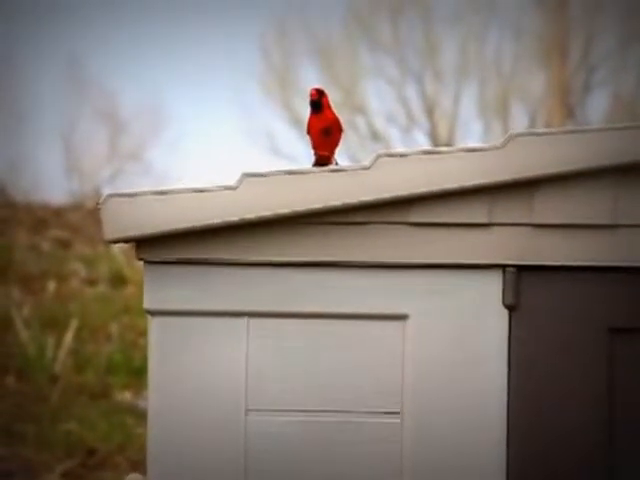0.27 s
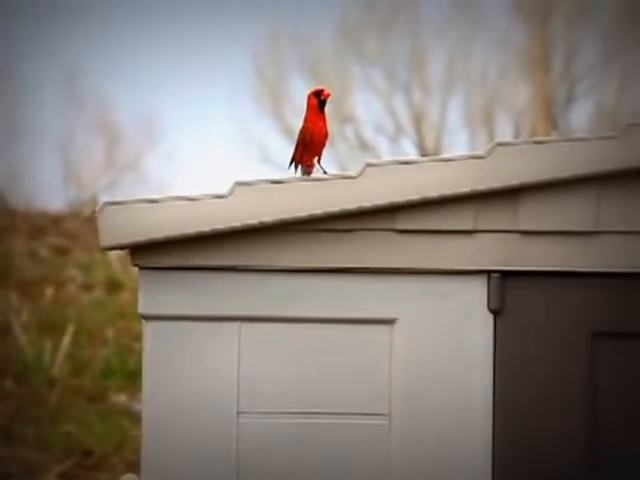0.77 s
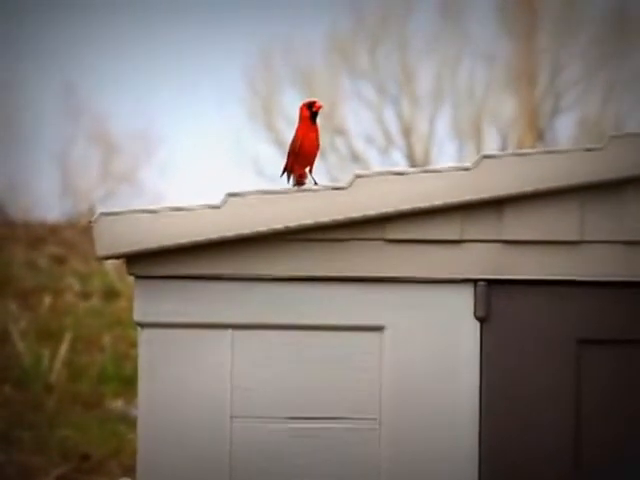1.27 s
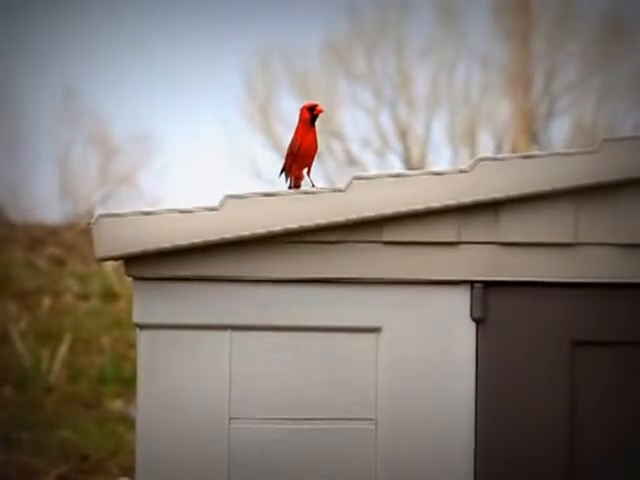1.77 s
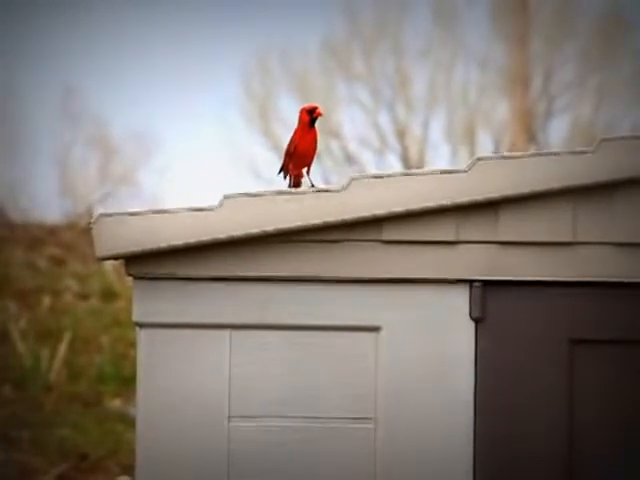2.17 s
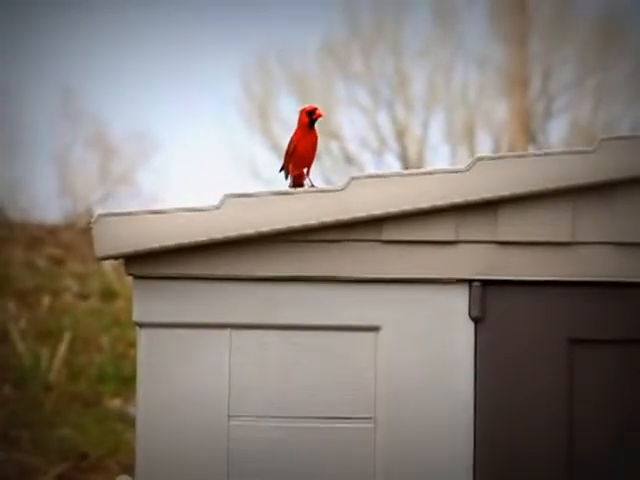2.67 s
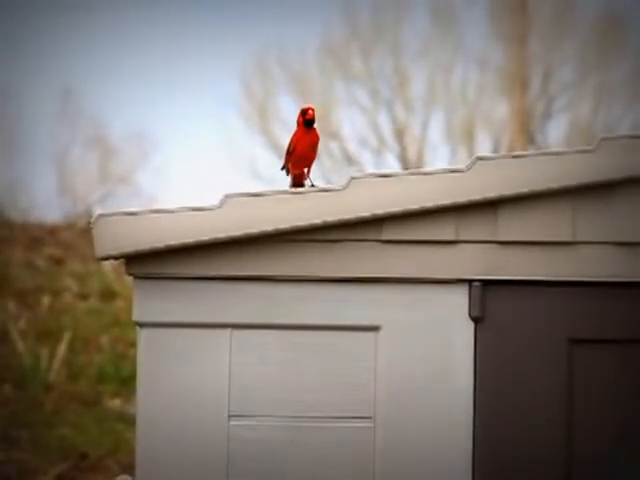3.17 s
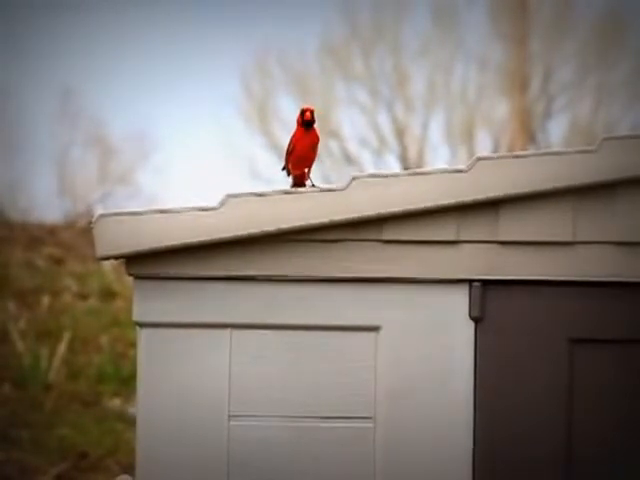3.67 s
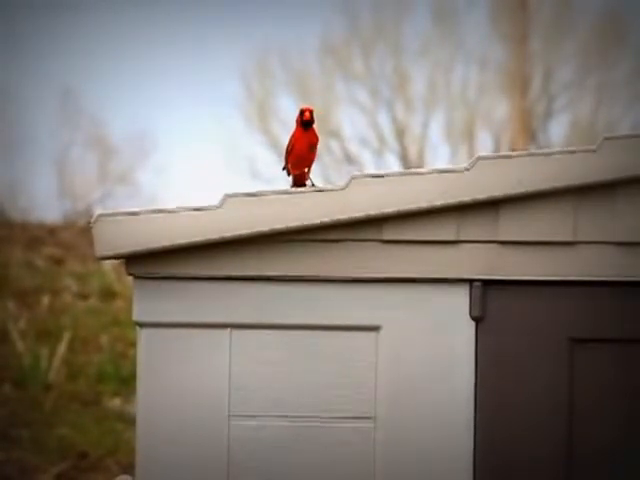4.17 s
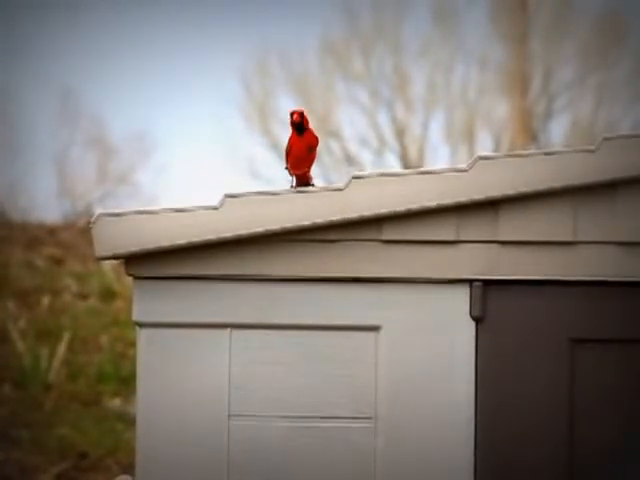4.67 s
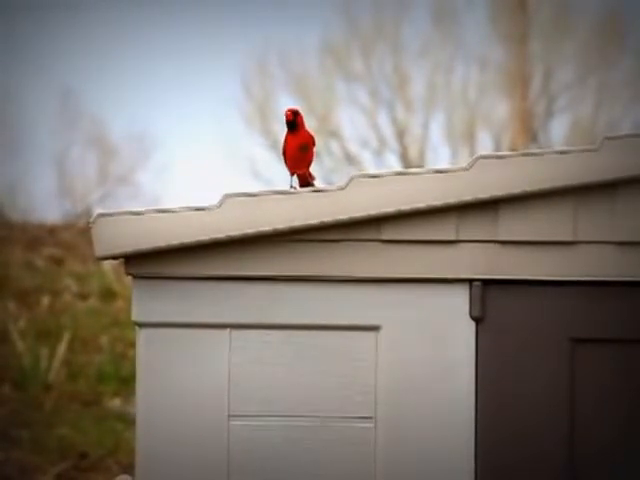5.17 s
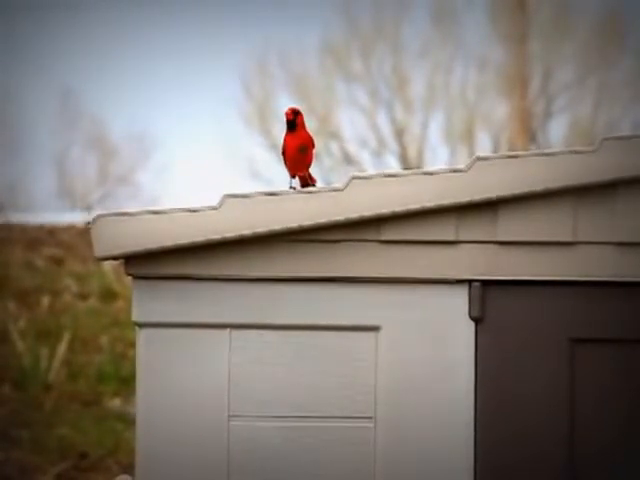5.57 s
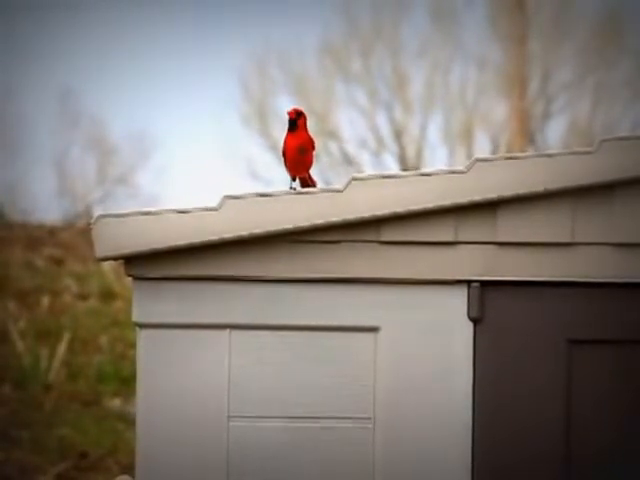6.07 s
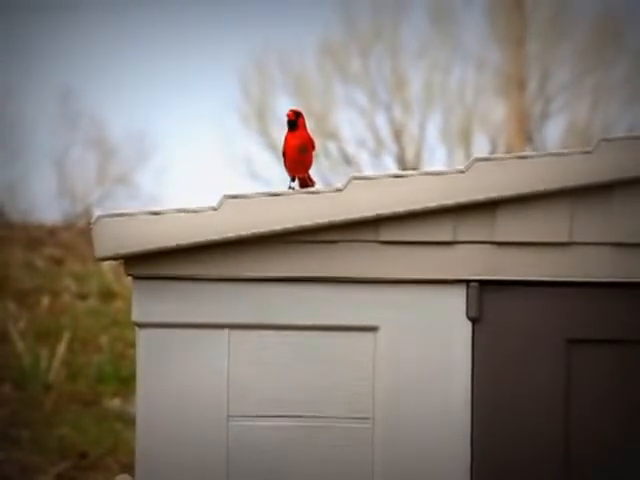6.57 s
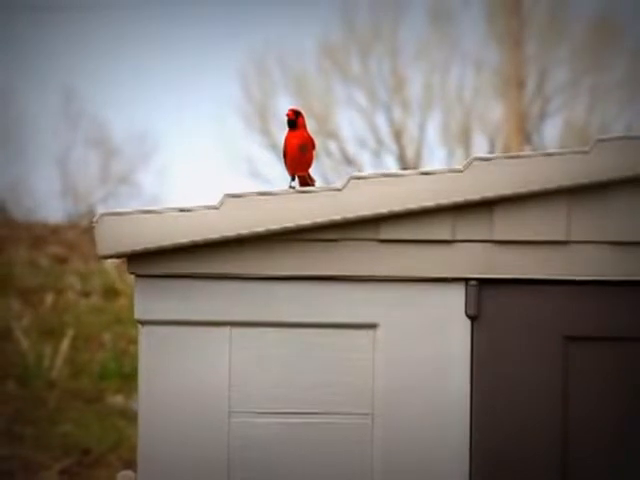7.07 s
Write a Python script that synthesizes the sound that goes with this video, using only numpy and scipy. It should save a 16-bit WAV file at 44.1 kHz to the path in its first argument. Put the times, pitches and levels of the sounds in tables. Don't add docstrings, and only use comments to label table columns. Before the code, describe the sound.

A red songbird on a shed roof whistles two quick arched phrases, with echoing yard birds chirping behind and a truck droning past on a road.

```python
import sys
import numpy as np
from scipy import signal
from scipy.fft import rfft, irfft, next_fast_len
from scipy.io import wavfile
from scipy.ndimage import uniform_filter1d

SR = 44100
rng = np.random.default_rng(int(sys.argv[2]) if len(sys.argv) > 2 else 0)


def ratio(d):
    e = np.asarray(d, float) / 20
    return 10 ** e


def master_out(mix):
    frames = np.transpose(np.atleast_2d(mix))
    ceiling = np.clip(frames, -1, 1)
    pcm = np.round(ceiling * 32767).astype(np.int16)
    wavfile.write(sys.argv[1], SR, pcm)


N = 323253

# (multiple of the pitch, level [dB])
ARCH = ([(0, 1900, -18), (.012, 2060, -3), (.027, 2175, 0), (.045, 2228, 3), (.058, 2135, 2),
         (.071, 1910, -1), (.085, 1730, -5), (.12, 1670, -12)], [(4, -17), (5, -37), (6, -25), (7, -40)])
# (time after start [s], pitch [Hz], level [dB])
PIP = [(0, 6620, -2), (.03, 6540, 0), (.04, 6500, -4), (.046, 6550, -24), (.053, 6620, -4),
       (.078, 6560, -7)]
# (time [s], level [dB], pitch factor, length factor)
PIPS = [
    (6.85, -51, .96, .95),
    (6.95, -48, 1., 1.1),
    (7.072, -45, 1., 1.),
    (7.2, -46, 1.01, 1.05),
]


def evened(x):
    return x / np.sqrt(np.mean(x ** 2) + 1e-20)


def read(points, hz):
    f, value = np.transpose(points)
    return np.interp(np.log(hz + 1), np.log(f + 1), value)


def add(mix, s, sound):
    at = round(s * SR)
    sound = sound[max(-at, 0):]
    part = mix[max(at, 0):][:len(sound)]
    part += sound[:len(part)]


def slow(count, top_hz):
    size = next_fast_len(count + SR)
    z = rfft(rng.standard_normal(count + SR), size)
    lowpass = np.exp(-(np.fft.rfftfreq(size, 1 / SR) / top_hz) ** 2)
    return evened(irfft(z * lowpass)[:count])


def noise(spectrum, patchy_db):
    frames, hz = N // 256 + 5, np.fft.rfftfreq(1024, 1 / SR)
    a, b, patches = rng.standard_normal((frames, 513, 3)).T
    patches = uniform_filter1d(patches, 12, axis=0)
    patches = evened(uniform_filter1d(patches, 14, axis=1))
    z = (a + 1j * b) * ratio(read(spectrum, hz)[:, None] + patchy_db * patches)
    return evened(signal.istft(z, nperseg=1024, noverlap=768)[1][:N])


def band(count, hz, width):
    size = next_fast_len(count)
    f = np.fft.rfftfreq(size, 1 / SR)
    bell = np.exp(-(2 * (f - hz) / width) ** 2)
    return evened(irfft(rfft(rng.standard_normal(count), size) * bell, size)[:count])


def rasp(x, hz, width):
    return uniform_filter1d(np.abs(x), 100) * band(N + 1, hz, width)[:N]


def whistle(rows, overtones=(), flutter_db=0., wobble=0.):
    s, hz, db = np.transpose(rows)
    t = np.arange(s[0], s[-1], 1 / SR)
    span = int(SR * np.min(np.diff(s)) * 0.6) + 1
    hz, db = (uniform_filter1d(np.interp(t, s, c), span, mode="nearest") for c in (hz, db))

    smooth = signal.butter(2, 350, fs=SR, output="sos")
    shake = evened(signal.sosfilt(smooth, rng.standard_normal((2, 9000))))[:, 500:500 + len(t)]
    phase = 2 * np.pi * np.cumsum(hz * (1 + wobble * shake[0])) / SR

    upper = 0
    for k, overtone_db in overtones:
        below_16k = np.clip((16000 - k * hz) / 800, 0, 1)
        upper = upper + ratio(overtone_db) * np.sin(k * phase) * below_16k
    beak = np.clip((t[-1] - t) / (.45 * (t[-1] - t[0])), 0, 1) ** 2
    tone = np.sin(phase) + ratio(-.4 * (db - db.max())) * upper * beak
    edge = np.sin(np.pi / 2 * np.clip(np.minimum(t - t[0], t[-1] - t) / .003, 0, 1)) ** 2
    return s[0], np.sqrt(2) * ratio(db + flutter_db * shake[1]) * tone * edge


def sing(calls, shape, overtones, flutter_db, wobble):
    out = np.zeros(N)
    for s, db, pitch, length in calls:
        path = np.array(shape) * [length, pitch, 1] + [s, 0, db]
        add(out, *whistle(path, overtones, flutter_db, wobble))
    return out


def glides(rows, flutter_db, wobble):
    out, share = np.zeros(N), np.array([0, .49, 1])
    for s, length, first_hz, last_hz, db in rows:
        hz = first_hz + (last_hz - first_hz) * share
        path = [s + length * share, hz, db - 6.5 * np.array([1, 0, 1])]
        add(out, *whistle(np.transpose(path), (), flutter_db, wobble))
    return out


def bursts(rows):
    out = np.zeros(N)
    for s, length, hz, width, db in rows:
        count = int(length * SR)
        burst = band(8192, hz, width) * ratio(4.0 * band(8192, 0, 250))
        add(out, s, ratio(db) * burst[:count] * np.hanning(count))
    return out


def singer():
    # (multiple of the pitch, level [dB])
    late_arch = (ARCH[0], [(4, -16.5), (5, -32), (6, -33), (7, -36)])
    rise = ([(0, 2450, 0), (.003, 3100, 1.5), (.006, 3600, 0), (.01, 3720, -3), (.02, 3740, -11)],
             [(2, -33), (3, -31), (4, -37)])
    fall = ([(0, 7400, -13), (.0035, 5800, -10), (.007, 4300, -2), (.012, 4170, 0), (.022, 4170, -3),
             (.039, 4150, -3)], [(2, -22), (3, -32)])
    hook = ([(0, 5000, -6), (.004, 4580, 0), (.015, 4520, -2), (.03, 4490, -5)], [(2, -34), (3, -30)])
    slur = ([(0, 2630, -3), (.01, 2657, 2.5), (.025, 2440, -6), (.04, 2084, -3.5), (.052, 2080, -17),
             (.062, 2143, -16), (.075, 2130, -19)], [(4, -26.5), (5, -34)])
    dip = ([(0, 2077, -6), (.015, 2044, -3), (.035, 2020, -4.5), (.055, 1910, -15), (.07, 1734, -28)],
            [(2, -31), (4, -37)])
    hill = ([(0, 1750, -9), (.008, 3370, -6), (.037, 3320, 1), (.042, 3050, 3), (.047, 2620, 3),
             (.052, 2560, -2)], [(5, -36)])
    # (time [s], level [dB], pitch factor, length factor)
    arches = [(-.058, -34.5, 1., 1.), (.19, -33.5, 1., 1.), (.451, -34, .99, 1.)]
    late_arches = [(5.458, -34.5, 1.007, 1), (5.711, -34, 1, 0.99), (5.958, -33.5, 1., 1),
                   (6.217, -32, 1.04, 0.86)]
    rises = [(.069, -28.5, 1., 1.25), (.313, -28, .98, 1.1), (.574, -29.5, .99, 1.1),
             (4.902, -34, 1.05, 1.), (5.323, -30, 1.05, 1.05), (5.582, -29.5, 1.03, 1.15),
             (5.835, -29, 1., 1.1), (6.085, -29.5, .99, 1.15), (6.322, -26.5, .945, 1.3)]
    falls_sung = [(.092, -24.5, 1.02, 1.05), (.335, -24.5, 1.005, 1.1), (.601, -30.5, 1., .45),
                  (5.608, -24.5, 1.044, 1.05), (5.859, -26.5, 1.01, .9), (6.111, -26.5, .972, .85),
                  (6.348, -24, .966, .92)]
    hooks = [(4.931, -35, 1.01, 1.), (5.352, -27, 1., 1.)]
    slurs = [(4.846, -31, 0.99, 0.83), (5.262, -26.5, 0.97, 1)]
    dips = [(5.055, -28.5, 1., .95), (5.2, -31, 1., 1.1)]
    hills = [(4.985, -32, 1., 1.07), (5.135, -33.5, 1., 1.03)]
    calls = arches, late_arches, rises, hooks, slurs, dips, hills
    shapes = ARCH, late_arch, rise, hook, slur, dip, hill
    rest = sum(sing(c, *shape, flutter_db=1.5, wobble=.00098) for c, shape in zip(calls, shapes))
    falling = sing(falls_sung, *fall, flutter_db=2.8, wobble=.003)
    return rest + falling + ratio(-27) * rasp(falling, 12100, 1600)


def chirper():
    # (time after start [s], pitch [Hz], level [dB])
    strands = [
        [(.006, 3800, -14), (.018, 4300, -4), (.025, 4740, -1), (.054, 4760, -4), (.058, 4050, -1),
         (.064, 3750, -1), (.074, 3350, -7)],
        [(.018, 4700, -12), (.027, 5400, -5), (.04, 5200, -9), (.052, 5200, -3), (.062, 5250, -12),
         (.08, 5200, -9), (.09, 5200, -16)],
        [(.022, 3900, -12), (.035, 4250, -7), (.055, 4150, -10)],
        [(.073, 4150, -2), (.089, 3400, -6)],
    ]
    # (time [s], level [dB], pitch factor, length factor)
    chirps = [
        (-.01, -30, 1., 1.),
        (2.57, -31, 1., 1.),
        (4.392, -27, 1., 1.),
        (5.853, -29.5, .995, .92),
    ]
    overtones = [(2, -31), (3, -34)]
    return sum(sing(chirps, strand, overtones, flutter_db=2.5, wobble=.012) for strand in strands)


def strays():
    # (time [s], pitch [Hz], level [dB])
    earlier = [(-.005, 2180, -33), (.025, 2180, -42), (.05, 2170, -48), (.15, 2120, -51)]
    # (time [s], length [s], first pitch [Hz], last pitch [Hz], level [dB])
    faint_falls = [(1.655, .014, 5000, 3500, -42), (1.678, .014, 4800, 3700, -44),
                   (1.6, .05, 2700, 3300, -54), (2.055, .022, 4800, 4300, -50),
                   (2.098, .02, 3100, 2600, -52), (.165, .014, 4200, 3700, -42),
                   (.183, .012, 4300, 3600, -42), (3.575, .014, 5000, 3200, -44),
                   (2.93, .02, 4650, 4700, -47), (2.878, .014, 3800, 3750, -45),
                   (4.415, .03, 3000, 2850, -41), (.902, .06, 3320, 3300, -47),
                   (2.895, .04, 4360, 4280, -44), (4.5, .05, 3380, 3850, -40), (4.51, .03, 3950, 4200, -43),
                   (2.375, .15, 2660, 2640, -52), (1.473, .016, 6900, 8100, -53),
                   (5.045, .028, 2900, 2600, -38), (1.992, .032, 4500, 4560, -45),
                   (4.905, .014, 3900, 3950, -37)]
    upper_pip = np.array(PIP) * [1, 1.345, 1] + [.012, 0, -18]
    out = sing(PIPS, upper_pip, (), flutter_db=5., wobble=.012)
    add(out, *whistle(earlier, (), flutter_db=3., wobble=.004))
    return out + glides(faint_falls, flutter_db=3.5, wobble=.012)


def truck():
    # (time [s], cycle rate [Hz])
    speed = [(0.0, 19.9), (0.59, 22.0), (1.45, 25.5), (1.65, 23.1), (2.2, 17.8), (3.0, 19.9), (4.12, 22.9),
             (5.25, 25.5), (6.08, 27.6), (6.6, 21.2), (6.74, 21.1), (7.33, 22.2)]
    # (time [s], level [dB])
    boom = [(0, -37.5), (1.0, -34), (2.15, -38.5), (2.75, -34), (3.3, -35.5), (3.56, -28), (4.26, -23.5),
            (4.85, -25.5), (5.2, -28), (6.45, -28.5), (7.04, -37), (7.33, -25.5)]
    # (time [s], half width [s], depth [dB])
    fades = [(1.46, 0.057, -14), (1.99, 0.06, -6), (3.87, 0.1, -14), (4.531, 0.091, -13.5),
             (5.05, 0.058, -8), (6.58, 0.035, -14)]
    # (time [s], level [dB])
    strain = [(0, -27), (1.4, -24), (1.7, -30), (2.4, -7), (2.95, -5.5), (3.3, -5), (4.7, -2.5),
              (5.7, -10.5), (6.15, -10), (6.5, -9), (6.9, 7), (7.33, -1.5)]
    # (multiple, level [dB], share of boom swing, share of strain)
    weaker_orders = [(7, -49, .6, .5), (6, -47, .7, .4), (4, -45, .3, .1), (16, -60.5, .45, .6)]
    # (frequency [Hz], half width [Hz], gain [dB])
    pipe = [(155, 18, 11), (375, 26, 11)]
    # (multiple, level [dB])
    side_orders = [(2, -64), (3, -79), (8, -50), (9, -54), (10, -57.5), (11, -58), (12, -61), (14, -60.5),
                   (18, -60.5), (21, -63.5)]

    t = np.arange(N) / SR
    hz = uniform_filter1d(np.interp(t, *np.transpose(speed)), 3000)
    phase = 2 * np.pi * np.cumsum(hz * (1 + 0.0029 * slow(N, top_hz=5.6))) / SR
    boom_db = uniform_filter1d(np.interp(t, *np.transpose(boom)), size=1500)
    fade_db = sum(db * np.exp(-((t - s) / width) ** 2) for s, width, db in fades)
    out = ratio(boom_db + fade_db) * np.sin(5 * phase)

    strain_db = np.interp(t, *np.transpose(strain))
    for k, db, boom_share, strain_share in weaker_orders:
        pipe_db = sum(gain_db * np.exp(-((k * hz - f) / width) ** 2) for f, width, gain_db in pipe)
        drift_db = 2.5 * np.repeat(slow(N // 16 + 1, top_hz=36.), 16)[:N]
        level_db = db + boom_share * (boom_db - boom_db.mean()) + strain_share * strain_db + pipe_db
        out += ratio(level_db + drift_db) * np.sin(k * phase + k)
    for k, db in side_orders:
        drift_db = 3.0 * np.repeat(slow(N // 16 + 1, top_hz=30.8), 16)[:N]
        out += ratio(db + strain_db + drift_db) * np.sin(k * phase + 2 * np.pi * rng.random())
    return np.sqrt(2) * out


def road():
    # (time [s], level [dB])
    nearness = [(0, -49.5), (2.57, -49), (4.8, -44.5), (5.12, -46), (5.78, -43), (6.4, -44.5), (6.599, -47),
                (7.19, -41.5), (7.33, -43.5)]
    # (frequency [Hz], density [dB per Hz])
    roar_spectrum = [(30, -27.5), (107, 1), (185, -21), (300, -18), (600, -24), (1050, -20), (2280, -28.5),
                     (9500, -77)]
    fizz_spectrum = [(1500, -4), (3000, 7), (5000, 2.5), (7000, -5), (9500, -22.5)]
    near_db = np.interp(np.arange(N) / SR, *np.transpose(nearness))
    roar = ratio(near_db + 7.5) * noise(roar_spectrum, patchy_db=0.45)
    fizz_db = -50 + 1.72 * (near_db - near_db.mean())
    return roar + ratio(fizz_db) * noise(fizz_spectrum, patchy_db=1.8)


def far_machine():
    # (frequency [Hz], width [Hz], level [dB])
    drones = [(857, 174, -51.5), (213.8, 5.7, -58)]
    return sum(ratio(db) * band(N + 1, hz, width)[:N] for hz, width, db in drones)


def chatter():
    # (time [s], length [s], frequency [Hz], width [Hz], level [dB])
    chatters = [(0.098, 0.17, 4060, 2030, -40.5), (1.64, 0.064, 4500, 1200, -41),
                (2.04, 0.064, 4280, 1520, -55), (3.516, 0.068, 6000, 1190, -51),
                (3.86, 0.12, 5000, 2200, -45), (4.327, 0.15, 4100, 900, -35.5),
                (4.342, 0.045, 7350, 1210, -57), (4.931, 0.07, 4630, 1710, -34),
                (2.539, 0.093, 4070, 1200, -43.5), (2.541, 0.048, 6560, 1300, -55),
                (6.762, 0.05, 4620, 1210, -50), (3.82, .09, 7340, 1200, -55.5)]
    return bursts(chatters)


def twitters():
    # (time after start [s], pitch [Hz], level [dB])
    chirrup = [
        [(0, 4200, -9), (.014, 5100, -5)],
        [(.022, 4700, -14), (.032, 5050, -10), (.045, 4750, -16), (.06, 4200, -20)],
        [(.012, 4300, -7), (.025, 3900, -7), (.055, 3780, -6)],
        [(.045, 3250, -6), (.07, 3390, 1), (.08, 3300, -3), (.088, 2980, -6), (.11, 2950, -8)],
    ]
    flick = [(0, 3315, -2), (0.02, 4950, 2), (.027, 4300, -5), (.045, 4730, -3)]
    crook = [(0, 3100, -7), (.015, 3380, -0.5), (.025, 2790, -6.5), (.033, 2780, 2)]
    hump = [(0, 4150, 3), (.008, 4540, 8), (.024, 4420, 6), (.042, 3700, -2)]
    lift = [(0, 4500, -12), (.007, 5280, -2), (.022, 5320, -3), (0.034, 5250, -14)]
    # (time [s], level [dB], pitch factor, length factor)
    chirrups = [(.795, -38, .99, 1.), (2.69, -32.5, 1., 1.05), (6.795, -33, 1.005, 1.03)]
    flicks = [(1.636, -43, 1.01, 1.1), (3.555, -38, .99, 1.3)]
    crooks = [(0.226, -36.5, 0.98, 1.7), (1.693, -31, 0.99, 0.91), (3.615, -30.5, 0.96, 1.02),
              (4.377, -41.5, 0.97, 1.8)]
    humps = [(1.48, -58, .94, 1.1), (.952, -50, 1, 1.1), (1.992, -50, 1, 0.95), (2.893, -66, 0.97, 1.4),
             (6.576, -48, 0.97, 1)]
    lifts = [(.55, -38.5, 1.05, 1.8), (1.403, -41.5, 1.05, 1.7), (6.5, -47, 1.02, 1.86)]
    # (time [s], length [s], first pitch [Hz], last pitch [Hz], level [dB])
    far_glides = [(.252, .022, 5250, 5650, -44), (1.6, .045, 5650, 5650, -45), (4.5, .04, 3450, 3950, -39),
                  (5.96, .06, 4170, 4230, -41), (.41, .025, 5050, 5500, -47), (1.37, .06, 6050, 6200, -58),
                  (1.61, .09, 6300, 6300, -52), (2.035, .012, 5000, 5050, -50),
                  (2.09, .014, 3550, 3650, -48), (2.61, .018, 2950, 3100, -44),
                  (2.735, .035, 5200, 5550, -48), (2.765, .022, 6800, 6800, -53),
                  (4.34, .06, 4350, 4050, -41), (4.375, .03, 6250, 6200, -48),
                  (4.38, .035, 3400, 3320, -39), (5.922, .036, 3400, 2750, -33),
                  (5.96, .045, 3250, 3750, -40), (6.812, .04, 3870, 3850, -43),
                  (6.885, .075, 3850, 3870, -43), (7., .018, 2750, 2750, -41), (.845, .04, 6600, 6700, -55),
                  (1.005, .03, 4350, 4330, -49), (1.036, .022, 4450, 4600, -50),
                  (1.122, .012, 3350, 3350, -47), (3.59, .014, 3330, 3280, -42),
                  (3.868, .03, 4300, 4050, -45), (3.882, .028, 4750, 5550, -45),
                  (3.955, .018, 3950, 4050, -47), (6.628, .04, 4850, 3950, -46),
                  (2.675, .03, 3400, 3550, -41), (6.888, .02, 8500, 8600, -58),
                  (7.125, .022, 9150, 9000, -56), (7.25, .03, 9350, 9200, -58)]
    shaped = [(chirrups, strand) for strand in chirrup]
    shaped += [(flicks, flick), (crooks, crook), (humps, hump), (lifts, lift)]
    rough = sum(sing(calls, shape, (), flutter_db=3.5, wobble=.018) for calls, shape in shaped)
    pips = sing(PIPS, PIP, (), flutter_db=3.5, wobble=.009)
    return rough + pips + glides(far_glides, flutter_db=3.5, wobble=.009)


def knocks():
    # (time [s], length [s], frequency [Hz], width [Hz], level [dB])
    knock_rows = [(6.386, .035, 1150, 600, -40), (6.984, .018, 750, 400, -40), (7.192, .02, 1100, 500, -42),
                  (7.258, .018, 1000, 700, -41), (7.255, .025, 2500, 800, -45),
                  (7.212, .016, 2900, 600, -46), (1.35, .08, 7500, 1100, -59)]
    return bursts(knock_rows)


def whistler():
    # (time after start [s], pitch [Hz], level [dB])
    vee = [(0, 2950, 2), (.015, 2830, 5), (.04, 2300, 2), (.062, 1900, 5), (.085, 2250, 1), (.105, 2700, 0),
           (.12, 2900, -2)]
    # (time [s], level [dB], pitch factor, length factor)
    vees = [
        (1.655, -47, 1.01, 1.01),
        (1.773, -44, .99, .99),
        (4.11, -41, 1.005, .99),
        (4.228, -38, 0.99, 0.95),
    ]
    # (time [s], length [s], first pitch [Hz], last pitch [Hz], level [dB])
    plain_glides = [(4.565, 0.025, 1980, 1980, -36), (4.775, 0.047, 2190, 2320, -39),
                    (5.18, 0.075, 2120, 2270, -34.5), (5.542, 0.049, 2780, 2696, -33),
                    (5.586, 0.025, 2700, 2680, -25.5), (5.617, 0.024, 3310, 2400, -26.5),
                    (5.64, 0.041, 2360, 2200, -30), (5.69, 0.026, 1900, 2040, -37),
                    (5.71, 0.028, 2010, 2480, -31)]
    # (time [s], pitch [Hz], level [dB])
    long_notes = [
        [(2.285, 2330, -55), (2.34, 2675, -37), (2.352, 2500, -42), (2.375, 1850, -42)],
        [(2.185, 1760, -52), (2.2, 1930, -48), (2.218, 2000, -43), (2.24, 1900, -50)],
        [(2.195, 3760, -50), (2.218, 4060, -48), (2.235, 3600, -49), (2.252, 3200, -41), (2.263, 3050, -45)],
        [(4.598, 2050, -42), (4.61, 2550, -37), (4.625, 2970, -31), (4.66, 2594, -38), (4.71, 2504, -37),
         (4.74, 2590, -38), (4.765, 2590, -44)],
    ]
    out = glides(plain_glides, flutter_db=2.5, wobble=.003)
    out += sing(vees, vee, (), flutter_db=2.5, wobble=.003)
    for rows in long_notes:
        add(out, *whistle(rows, (), flutter_db=2.5, wobble=.003))
    return out


def walls(x, echoes):
    t, taps = np.arange(SR // 16) / SR, np.zeros(SR // 16)
    for s, spread, db in echoes:
        clump = rng.standard_normal(len(t)) * (t > s) * np.exp(-np.abs(t - s) / spread * 2)
        taps += ratio(db) * clump / np.linalg.norm(clump)
    return x + signal.oaconvolve(x, taps)[:N]


def shed_walls(near):
    # (delay [s], spread [s], level [dB])
    wall_echoes = [(.0175, .001, -11), (.004, .01, -16), (.016, .025, -17)]
    return walls(near, wall_echoes)


def hedges(far):
    # (delay [s], spread [s], level [dB])
    hedge_echoes = [(.018, .001, -11), (.006, .02, -15), (.03, .03, -14)]
    return ratio(-0.5) * walls(far, hedge_echoes) + ratio(-24.5) * rasp(far, 9100, 11000)


def siding(x):
    # (delay [s], spread [s], level [dB])
    board_echoes = [(.0145, .0012, -8), (.031, .004, -14), (.012, .045, -14)]
    low = signal.sosfilt(signal.butter(4, 3600, fs=SR, output="sos"), x)
    return walls(low, board_echoes) - low


def foliage(near):
    treble = signal.sosfilt(signal.butter(6, 5500, "highpass", fs=SR, output="sos"), near)
    return walls(treble, [(.02, .02, -7)]) - treble


def yard_tail(shrink):
    # (frequency [Hz], decay time to -60 dB [s])
    yard_decay = [(1500, 1), (4000, 0.93), (9000, 0.33), (16000, 0.046)]
    taps = np.zeros(SR)
    at = np.arange(400, SR - 20, 20)
    taps[at + rng.integers(0, 20, len(at))] = rng.choice([-1., 1.], len(at))
    hz, t, z = signal.stft(taps, SR, nperseg=256)
    decay = ratio(-60 * t / (shrink * read(yard_decay, hz)[:, None]))
    tail = signal.istft(z * decay, SR, nperseg=256)[1]
    return tail / np.linalg.norm(tail)


def leafy_tail(near, middle, far):
    stir = band(N + 1, 0, 200)[:N]
    sent = stir * (ratio(-14.5) * near + ratio(-52.0) * middle)
    wet = signal.oaconvolve(sent, yard_tail(shrink=0.51))[:N]
    fast_stir = band(N + 1, 0, 700)[:N]
    far_sent = ratio(-12.5) * fast_stir * far + ratio(-17) * middle
    return wet + signal.oaconvolve(far_sent, yard_tail(shrink=.4))[:N]


def ringing(x):
    return signal.oaconvolve(x, yard_tail(shrink=0.89))[:N]


def scene():
    near = singer()
    middle = whistler()
    far = chirper() + chatter() + ratio(-1.5) * twitters()
    house_echo = ratio(-27.0) * np.roll(middle, round(.019 * SR))
    birds = shed_walls(near) + middle + house_echo + hedges(far) + strays()
    wet = leafy_tail(near, middle, far) + foliage(near) + siding(near + middle)
    wet += ringing(ratio(-19) * near + ratio(-26) * middle + ratio(-15.5) * far)
    return (birds + wet + knocks() + truck() + road() + far_machine())[None]


def roll_off(x):
    return signal.sosfilt(signal.butter(12, 15740, fs=SR, output="sos"), x)


def record(dry):
    # (frequency [Hz], density [dB per Hz])
    hiss_spectrum = [(2940, -30), (5000, -6.5), (5270, -21), (5660, -3), (8640, -1), (12000, -2.5),
                     (15600, -8.5)]
    heard = dry + ratio(-63) * noise(hiss_spectrum, patchy_db=.6)
    heard = signal.sosfilt(signal.butter(3, 48., "highpass", fs=SR, output="sos"), heard)
    band_limit = signal.firwin(511, 15650, window=("kaiser", 9), fs=SR)
    heard = signal.oaconvolve(heard, band_limit[None], "same")
    return roll_off(heard)


dry = scene()
out = record(dry)
master_out(out)
```